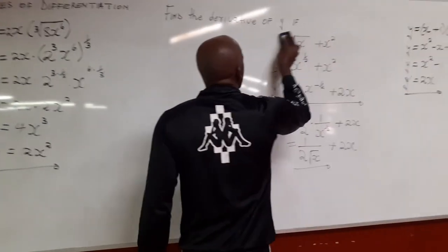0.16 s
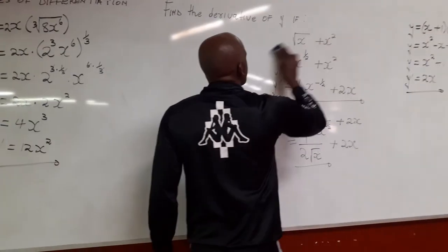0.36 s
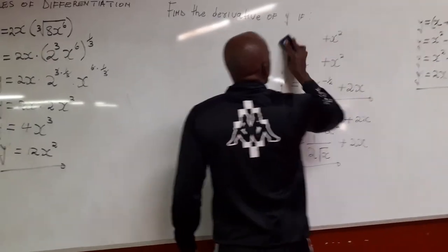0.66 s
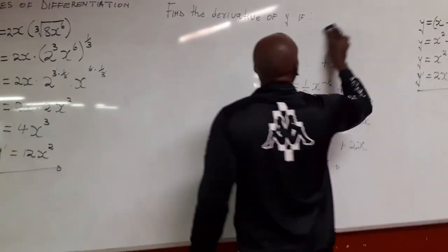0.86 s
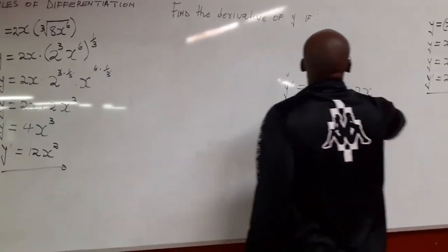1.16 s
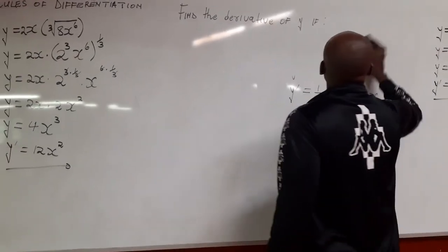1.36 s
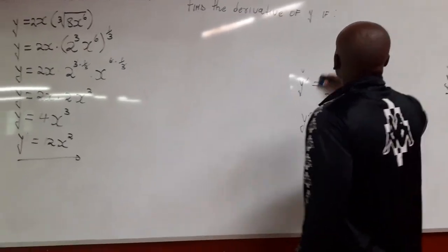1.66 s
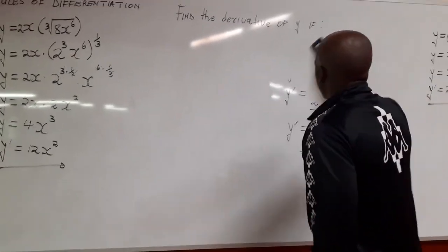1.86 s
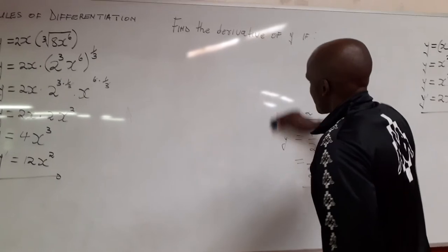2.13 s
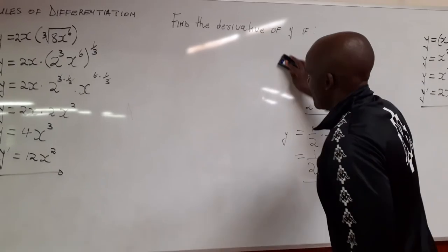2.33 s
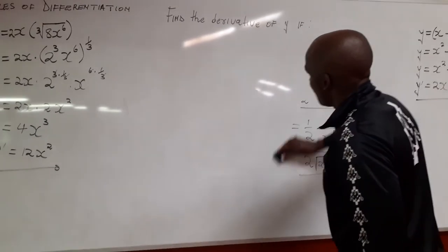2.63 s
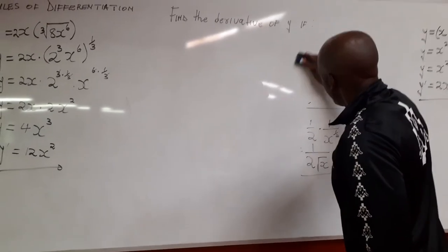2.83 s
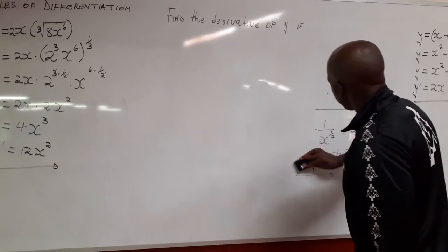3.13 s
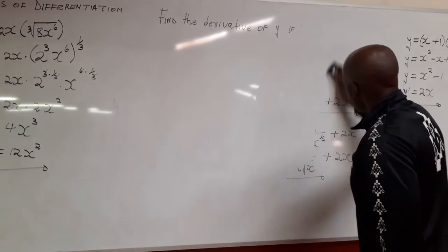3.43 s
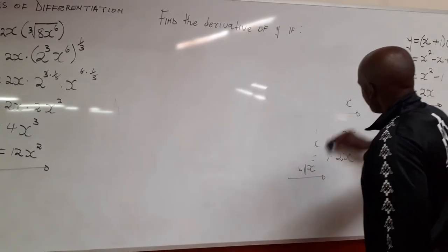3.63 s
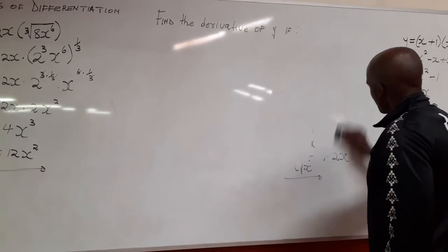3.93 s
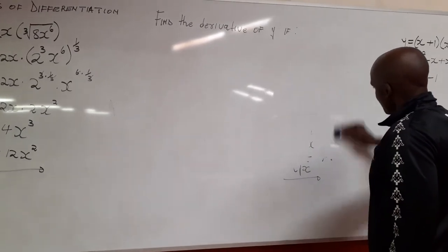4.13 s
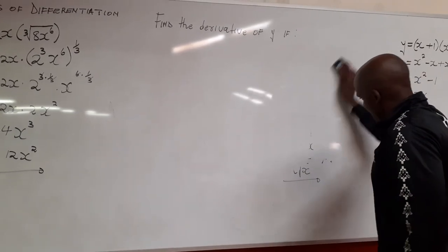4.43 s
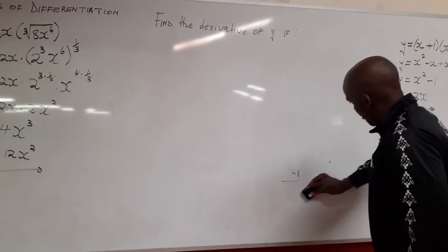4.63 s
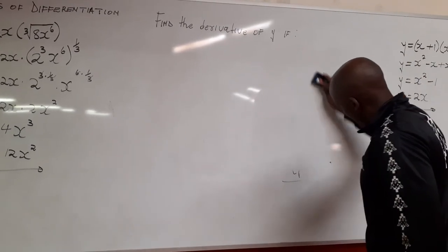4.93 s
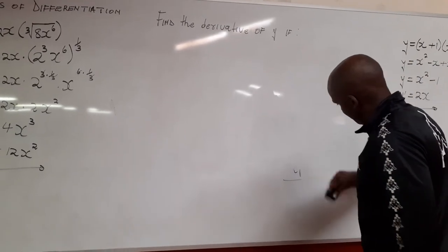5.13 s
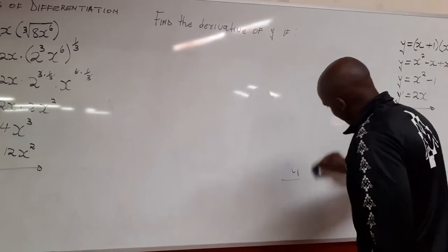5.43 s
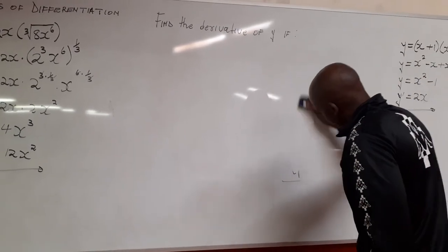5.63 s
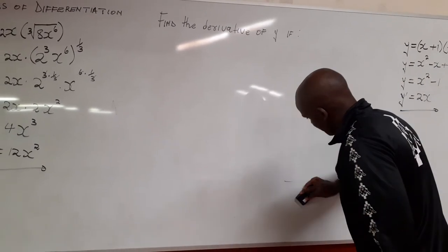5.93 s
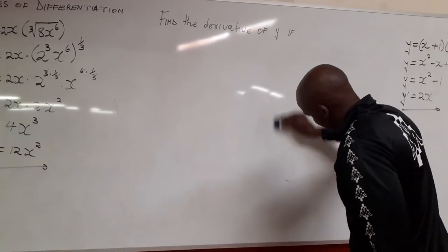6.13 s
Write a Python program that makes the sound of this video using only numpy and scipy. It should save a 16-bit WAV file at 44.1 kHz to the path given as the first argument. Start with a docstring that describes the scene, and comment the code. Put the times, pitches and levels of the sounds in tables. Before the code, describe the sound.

A felt eraser wipes a whiteboard in a bare classroom for about six seconds, hissing softly back and forth at roughly four strokes a second while the board booms gently. A hard rasping swipe opens, followed by small squeaks near 0.4, 1 and 1.5 seconds. A finger partly covers the left side of the hand-held microphone, dulling that side and making close knocks and rubs far louder than the wiping. The loudest knock is at 0.1 seconds, and more follow until about 3 seconds. The plastic case clicks a few times between 1.8 and 2.5 seconds. Hard swipes stand out at 2.7 and 4.5 seconds, the latter with a squeak and a few lighter bumps. Low hoots come between them, around 3.5 seconds. Near 5.6 seconds the case creaks faintly, and a low hand rumble runs under the last strokes.

```python
"""A felt eraser wipes a whiteboard in a bare classroom. From the start, friction hisses with each stroke
and the board booms softly; a hard swipe comes first, then small stick-slip squeaks. A finger half covers
the left microphone port of a hand-held camera, dulling it, and bumps and rubs there, most in the first
three seconds. Around 2 s the case clicks. Hard swipes stand out at 2.7 s and 4.5 s, with low hoots
between them. Near 5.6 s the case creaks and the holding hand shudders under the last strokes."""
import sys
import numpy as np
from scipy import signal
from scipy.fft import rfft, irfft, next_fast_len
from scipy.io import wavfile
from scipy.ndimage import uniform_filter1d

SR = 44100
rng = np.random.default_rng(int(sys.argv[2]) if len(sys.argv) > 2 else 0)


def put_to_file(sound):
    """Save the sound as 16-bit audio at rate SR, in the file named by the first command-line argument."""
    columns = np.atleast_2d(sound).T  # one column per channel
    safe = np.clip(columns, -1, 1)
    whole_steps = np.round(safe * 32767)
    wavfile.write(sys.argv[1], SR, whole_steps.astype(np.int16))


N = 277389
TIME = np.arange(N) / SR

# Event levels are those at the source, ahead of filters and channel gains.
# strokes to and fro: start t/s, hiss level/dB, change of hiss at the opening turn/dB, boom level/dB
STROKES = [(-.14, -53.5, 10, -50), (.19, -63, -8, -58), (0.344, -58.5, -4, -63), (0.576, -61, -9, -60.5),
           (.765, -56, -8.5, -70), (1.062, -61.5, -3, -56), (1.279, -61, -4.5, -62), (1.46, -59, -7, -58),
           (1.701, -60.5, -6, -58.5), (1.895, -59.5, -7.5, -59.5), (2.14, -61.5, -0.5, -67),
           (2.36, -63.5, -13, -59), (2.531, -50, -2.5, -53.5), (2.77, -61.5, 0, -57.5),
           (2.985, -59.5, -8.5, -60), (3.205, -60.5, -6.5, -63), (3.49, -62.5, -6.5, -61),
           (3.66, -63, -4.5, -60.5), (3.88, -62.5, -9.5, -71), (4.071, -65.5, -4, -72),
           (4.36, -49, -4, -55), (4.701, -63, -7, -72.5), (4.981, -61, -7.5, -65),
           (5.192, -62.5, -5, -61.5), (5.386, -66, -6.5, -61.5), (5.52, -65.5, 0, -63.5),
           (5.78, -60, -13.5, -65), (6.02, -59.5, -8, -72)]
# hard swipes: peak t/s, swell t/s, fade to 1/e t/s, low rasp level/dB, high rasp level/dB, drum level/dB
SWIPES = [(.035, 0.12, 0.055, -45.5, -47.5, -47), (.4, 0.062, 0.18, -65.5, -66, -61),
          (0.818, 0.078, 0.41, -71, -69, -66.5), (1.601, .04, 0.3, -78, -63, -74),
          (2.125, .085, .045, -60, -52.5, -69), (2.51, 0.067, 0.082, -67, -65, -72),
          (2.689, 0.095, .16, -46, -52.5, -46.5), (3.43, 0.084, 0.063, -71, -89, -64.5),
          (3.62, 0.092, 0.11, -63.5, -86.5, -66), (4.512, .105, .044, -51, -45.5, -61.5),
          (5.14, .02, 0.067, -78.5, -79, -77.5), (5.938, 0.013, 0.047, -71, -70.5, -71)]
# squeaks and hoots of the pad: t/s, length t/s, level/dB, start f/Hz, end f/Hz, bandwidth f/Hz
SQUEAKS = [(.33, 0.076, -58, 2350, 1970, 300), (0.408, 0.07, -61, 1880, 1800, 300),
           (1.007, 0.1, -62, 2220, 1590, 1023), (1.516, 0.063, -68, 4080, 3800, 200),
           (1.561, .046, -71, 3040, 2750, 250), (3.401, 0.081, -57.5, 415, 466, 87),
           (3.568, .17, -65.5, 430, 434, 140), (3.57, 0.16, -66.5, 1220, 1140, 188),
           (3.592, 0.16, -75.5, 1530, 1660, 300), (4.482, .16, -56, 2360, 2550, 420)]
# finger bumps on the port: t/s, knock level/dB, knock f/Hz, thump level/dB, thump f/Hz
BUMPS = [(0.067, -39, 2500, -24, 280), (0.1025, -1.5, 1177, -6.5, 205), (0.3148, -18, 555, -19.5, 181),
         (0.4796, -20, 342, -20, 87), (0.5025, -54, 1340, -26, 92), (0.6236, -49, 500, -28.5, 262),
         (.8916, -15, 740, -20.5, 176), (1.0188, -51, 996, -33.5, 84), (1.168, -28.5, 830, -24, 196),
         (1.4663, -34, 772, -33, 179), (1.6012, -24.5, 380, -30, 85), (1.6216, -51, 920, -27.5, 124),
         (1.9347, -41, 860, -38.5, 96), (2.1214, -41, 3920, -30, 260), (2.4537, -39.5, 260, -29.5, 95),
         (2.5249, -29, 294, -40, 90.8), (2.817, -16.5, 1080, -20.5, 143), (4.4047, -32.5, 383, -32, 140),
         (4.6077, -50, 1810, -31, 163), (4.6255, -39.5, 835, -36, 138)]
# finger slides over the port: t/s, length t/s, rumble level/dB, scratch level/dB
RUBS = [(0.102, 0.0051, -21, -22.5), (0.111, 0.044, -45, -46.5), (0.316, 0.012, -31, -36),
        (.35, 0.11, -62, -71), (0.475, 0.0038, -55, -41), (0.497, .015, -53, -60),
        (0.623, 0.044, -48, -59.5), (0.891, 0.1, -43, -44), (0.918, 0.0043, -52, -40.5),
        (0.954, 0.0075, -63, -42), (1.166, 0.13, -46, -48), (1.254, 0.0027, -59, -40),
        (1.469, 0.051, -45, -47.5), (1.621, 0.12, -53.5, -54.5), (1.768, 0.11, -49.5, -55),
        (1.936, 0.23, -49.5, -60), (2.658, 0.16, -45, -53), (2.811, 0.053, -38.5, -43),
        (2.882, 0.077, -42.5, -48), (3.319, 0.076, -48, -66.5), (3.414, 0.04, -45, -69),
        (4.594, 0.11, -48, -58)]
CLICKS = [(1.8272, -23, 1250, -27.5), (1.829, -39, 3500, -31), (1.932, -29.5, 1110, -46),
          (2.0598, -34, 1490, -50), (2.4982, -27, 2700, -34)]  # case clicks: t/s, tick level/dB, tick f/Hz, snap level/dB
CREAK = [(5.615, -77, 660), (5.648, -57, 730), (5.671, -61, 887), (5.696, -71, 986)]  # course of the case's creak: t/s, level/dB, resonance f/Hz
SHUDDER = [(5.52, -81.5), (5.57, -62.5), (5.8, -72), (6.03, -60.5), (6.27, -85.5)]  # course of the holding hand's shudder: t/s, level/dB
# spectral shapes, each: f/Hz, relative level/dB
FELT_HISS = [(500, -24), (2300, -14.5), (3300, -10), (4500, -4.5), (6000, -2), (8600, 3), (9600, -5.5),
             (10700, -7.5), (12300, -1), (15500, -3)]  # fibres on the board
PANEL_BOOM = [(15, -57), (30, -35), (60, -3), (85, -7), (105, 7.5), (135, -9.5), (170, -7), (300, -41.5)]  # the board's lowest modes
PANEL_DRUM = [(120, -23.5), (220, -8), (330, 5.5), (430, -1), (600, -15), (900, -17), (2000, -61.5)]  # its higher, hollow modes
LOW_RASP = [(300, -20), (560, -9), (820, 0.5), (1120, -5.5), (1500, -2.5), (1900, -8.5), (3000, -32.5)]  # hard-pressed pad, lower band
HIGH_RASP = [(1000, -20.5), (1700, -3), (2350, -3), (3200, -6.5), (4500, -12), (6000, -12), (9000, -35)]  # hard-pressed pad, upper band
SKIN_RUMBLE = [(15, -26.5), (50, -14), (105, 3), (200, -7), (350, -1.5), (600, -20.5), (1200, -29),
               (4000, -72)]  # sliding finger, lower band
SKIN_SCRATCH = [(200, -5.5), (550, 2), (900, 4), (1400, -6), (2300, -4), (3300, -14.5), (4500, -22),
                (6000, -35.5), (10000, -57.5)]  # sliding finger, upper band
HAND_TREMBLE = [(15, -17), (35, 0.5), (60, 5), (80, -3), (140, -31)]  # shudder of the holding hand
ROOM_AIR = [(20, -7), (60, 7), (105, 14.5), (160, 18.5), (400, 9.5), (600, 7.5), (1400, -4), (2500, -7.5),
            (8000, -10), (16000, -11)]  # steady background
COVERED_PORT = [(60, -1), (330, 0), (900, -4.5), (1400, -8), (2300, -5), (4500, -6), (6000, -11),
                (8500, -27), (9700, -15.5), (10800, -8.5), (12300, -9.5), (15000, -12.5)]  # transmission past the finger
ROOM_DECAY = [(125, 1.1), (500, 1.1), (1400, 0.79), (2500, 1.25), (5000, 2.2), (12000, .3)]  # classroom reverberation: f/Hz, 60 dB decay t/s


def eraser():
    """Sliding friction: felt fibres hiss while the forced vibration of the panel booms and drums."""
    hiss_gain, boom_gain = stroke_gains()
    drum_t60_s = 1.5
    drum_fade_s = drum_t60_s / np.log(1000)
    ring = sum(amp(db) * press(s, swell_s, drum_fade_s) for s, swell_s, _, _, _, db in SWIPES)
    fibres = early_reflections(friction(FELT_HISS, slips_per_s=3600, spread_db=1.5), echo_db=-22)
    fizz = signal.sosfiltfilt(signal.butter(4, 8800, "high", fs=SR, output="sos"), fibres)
    sheen = np.minimum(hiss_gain / amp(-59), 1) ** 0.27  # a weak hiss loses its finest fizz
    hiss = hiss_gain * (fibres + (sheen - 1) * fizz)
    boom = boom_gain * friction(PANEL_BOOM, slips_per_s=2700, spread_db=2.0)
    drum_gain = np.hypot(amp(-10) * boom_gain, ring)  # strokes and ringing swipes add in power
    drum = drum_gain * friction(PANEL_DRUM, slips_per_s=1600, spread_db=-0.5)
    return hiss + boom + drum


def stroke_gains():
    """Reciprocating motion: hiss dips as the hand slows into a turn; boom glides from stroke to stroke."""
    last_turn_s, last_dip_db = 6.3, -16.5
    rest, fastest = .06, 0.54  # shares of a stroke: still at each end, gone by at top speed
    start, hiss_db, dip_db, boom_db = np.transpose(STROKES)
    turns = np.append(start, last_turn_s)
    progress = np.interp(TIME, turns, np.arange(len(turns))) % 1
    speed = np.sin(np.pi * np.interp(progress, [rest, fastest, 1 - rest], [0, .5, 1]))
    middle = start + np.diff(turns) / 2
    dip = np.interp(TIME, turns, np.append(dip_db, last_dip_db)) * (1 - speed ** 1.1)
    hiss_gain = amp(np.interp(TIME, middle, hiss_db) + dip)
    boom_gain = amp(np.interp(TIME, middle, boom_db) + 0.5 * (2.5 - speed))
    return hiss_gain, boom_gain


def swipes():
    """Friction grows with normal force: pressed hard, the pad rasps and excites the room."""
    low, high = np.zeros((2, N))
    for s, swell_s, fade_s, low_db, high_db, _ in SWIPES:
        push = press(s, swell_s, fade_s)
        low += amp(low_db) * push
        high += amp(high_db) * push
    rasp = low * friction(LOW_RASP, slips_per_s=1500, spread_db=0.5)
    rasp += high * friction(HIGH_RASP, slips_per_s=2500, spread_db=3.5)
    return classroom(early_reflections(rasp, echo_db=-13), wet=0.15)


def press(peak_s, swell_s, fade_s):
    """Envelope of a swipe: a smooth swell, then exponential decay."""
    swell = np.clip(1 + (TIME - peak_s) / swell_s, 0, 1)
    return np.sin(np.pi / 2 * swell) ** 2 * np.exp(-np.maximum(TIME - peak_s, 0) / fade_s)


def squeaks():
    """Stick-slip: the half-sticking pad gives a narrow band of noise that glides in pitch."""
    out = np.zeros(N)
    for s, length, db, start_hz, end_hz, width in SQUEAKS:
        hz = np.linspace(start_hz, end_hz, int(length * SR))
        noise = rng.standard_normal(SR)[:len(hz)]
        whistle = resonate(resonate(noise, hz, width), hz, width)
        add(out, s, amp(db) * unit(whistle * signal.windows.tukey(len(hz), .5)))
    return classroom(np.array([out, out]), wet=0.51)


def finger():
    """Impact and cavity resonance: a knock, then a slower swing of the port's air; sliding skin rubs."""
    out, rumble, scratch = np.zeros((3, N))
    for s, knock_db, knock_hz, thump_db, thump_hz in BUMPS:
        add(out, s, amp(knock_db) * pulse(knock_hz, rise_turns=.36, sink=0.87))
        add(out, s + 1.5 / knock_hz, amp(thump_db) * pulse(thump_hz, rise_turns=.33, sink=0.25))
    out += amp(-6) * resonate(out, np.full(N, 930), width_hz=220)  # hollow clack of the air pocket
    # the port leaks bass; soft flesh damps treble
    out = signal.sosfilt(signal.butter(2, [68, 2700], "band", fs=SR, output="sos"), out)
    for s, length, rumble_db, scratch_db in RUBS:
        add(rumble, s, amp(rumble_db) * slide(length))
        add(scratch, s, amp(scratch_db) * slide(length))
    out += rumble * friction(SKIN_RUMBLE, slips_per_s=860, spread_db=2.5, channels=1)[0]
    out += scratch * friction(SKIN_SCRATCH, slips_per_s=1200, spread_db=1.5, channels=1)[0]
    return out * amp([[0], [-42]])


def slide(length, grip_s=0.005, ease_db=-5, release_s=.011):
    """Contact pressure of a sliding finger: quick grip, slow easing, exponential release."""
    t = TIME[:SR // 2]
    grip = np.minimum(t / grip_s, 1)
    easing = amp(ease_db * np.minimum(t / length, 1))
    return grip * easing * np.exp(-np.maximum(t - length, 0) / release_s)


def case_clicks():
    """Impulse response of a plastic case: a tick and snap near the right port, a thud in the body."""
    ticks, snaps, thuds = np.zeros((3, N))
    body_hz, thud_peak_s, snap_decay_s = 315, 0.0035, 0.00065
    t = TIME[:SR // 10]
    thud = np.sin(2 * np.pi * body_hz * t) * t / thud_peak_s * np.exp(1 - t / thud_peak_s)
    snap_fade = np.exp(-TIME[:SR // 100] / snap_decay_s)
    for s, db, hz, snap_db in CLICKS:
        bright_noise = unit(np.diff(rng.standard_normal(SR // 100 + 1)))
        add(ticks, s, amp(db) * pulse(hz, rise_turns=0.23, sink=0.81))
        add(thuds, s, amp(db - 19) * thud)
        add(snaps, s, amp(snap_db) * bright_noise * snap_fade)
    ticks += amp(-2) * resonate(ticks, np.full(N, 1540), width_hz=260)  # the shell rings briefly
    # small parts radiate little bass
    ticks = signal.sosfilt(signal.butter(3, 720, "high", fs=SR, output="sos"), ticks)
    return ticks * amp([[-3], [0]]) + snaps * amp([[-15], [0]]) + thuds


def case_creak(slips_per_s=600):
    """Stick-slip in the case: irregular impulses drive a rising resonance."""
    slips = (rng.random(N) < slips_per_s / SR) * rng.uniform(0.83, 1, N)
    s, _, hz = np.transpose(CREAK)
    hz = np.interp(TIME, s, hz)
    ringing = resonate(resonate(slips - slips.mean(), hz, width_hz=370), hz, width_hz=320)
    return envelope(CREAK) * unit(ringing) * amp([[2], [-2]])


def hand_shudder():
    """Structure-borne noise: the trembling hand rumbles through the case."""
    return envelope(SHUDDER) * unit(colour(rng.standard_normal((2, N)), HAND_TREMBLE))


def early_reflections(x, echo_db):
    """Comb filtering: delayed copies from board, floor and desks interfere with the direct sound."""
    out = x.copy()
    for channel, direct in zip(out, x):
        for delay_s in rng.uniform(.002, .022, size=6):
            add(channel, delay_s, amp(echo_db) * rng.choice([-1, 1]) * direct)
    return unit(out) * x.std()


def classroom(x, wet):
    """Reverberation: sparse reflections, decaying at a rate set by frequency, take the power share wet."""
    taps = rng.standard_normal((2, SR)) * (rng.random((2, SR)) < 3000 / SR)
    hz, t, bands = signal.stft(taps, SR, nperseg=256)
    decay = amp(-60 * t / read(ROOM_DECAY, hz)[:, None])
    tail = signal.istft(bands * decay, SR, nperseg=256)[1]
    echo = unit(signal.fftconvolve(x, tail, axes=1)[:, :N]) * x.std()
    return np.sqrt(1 - wet) * x + np.sqrt(wet) * echo


def room_air():
    """Ambient noise: a faint stationary rush, strongest in the bass."""
    return amp(-75) * unit(colour(rng.standard_normal((2, N)), ROOM_AIR))


def friction(spectrum, slips_per_s, spread_db, channels=2):
    """Shot noise: tiny slips of uneven size over a smooth rush, coloured by the body they shake."""
    shape = (channels, N)
    slips = (rng.random(shape) < slips_per_s / SR) * rng.choice([-1, 1], shape)
    slips = slips * amp(spread_db * np.minimum(rng.exponential(1, shape), 4))
    return unit(colour(unit(slips) + rng.standard_normal(shape), spectrum))


def resonate(x, hz, width_hz):
    """Forced response of one damped mode whose frequency follows the curve hz."""
    phasor = np.exp(2j * np.pi * np.cumsum(hz) / SR)
    pole = np.exp(-np.pi * width_hz / SR)
    return 2 * (phasor * signal.lfilter([1 - pole], [1, -pole], x / phasor)).real


def pulse(hz, rise_turns, sink):
    """Heavily damped oscillation: its envelope peaks after rise_turns cycles and its pitch sinks."""
    turns = np.log1p(sink * hz * np.arange(SR // 6) / SR) / sink
    age = turns / rise_turns
    return age * np.exp(1 - age) * np.sin(2 * np.pi * turns)


def colour(x, spectrum):
    """Linear filtering by a table of f/Hz, level/dB."""
    size = next_fast_len(N + 4096)
    gain = amp(read(spectrum, np.fft.rfftfreq(size, 1 / SR)))
    return irfft(rfft(x, size) * gain, size)[..., :N]


def read(points, hz):
    """Interpolation on a logarithmic frequency axis."""
    f, value = np.transpose(points)
    return np.interp(np.log(hz + 1), np.log(f + 1), value)


def envelope(curve):
    """Smoothed gain from rows of t/s, level/dB, silent outside them."""
    s, db = np.transpose(curve)[:2]
    return uniform_filter1d(amp(np.interp(TIME, s, db)) * (TIME > s[0]) * (TIME < s[-1]), size=90)


def add(mix, s, sound):
    """Superposition of a sound starting at s seconds."""
    part = mix[max(round(s * SR), 0):][:len(sound)]
    part += sound[:len(part)]


def amp(db):
    """Amplitude ratio from decibels."""
    return 10 ** (np.asarray(db) / 20)


def unit(x):
    """Normalisation to rms 1."""
    return x / np.sqrt(np.mean(x ** 2) + 1e-20)


def scene():
    """Transmission loss: the finger dulls all sound at the left port except its own bumps and rubs."""
    left, right = (eraser() + swipes() + squeaks()
                   + case_clicks() + case_creak() + hand_shudder() + room_air())
    return np.array([colour(left, COVERED_PORT), right]) + finger()


def record(dry, low_hz=45, high_hz=15850):
    """Band limiting: the camera cuts deep bass and the highest treble."""
    thin = signal.sosfilt(signal.butter(3, low_hz, "high", fs=SR, output="sos"), dry)
    lowpass = signal.firwin(511, high_hz, window=("kaiser", 9), fs=SR)
    return signal.oaconvolve(thin, lowpass[None], "same")


dry = scene()
out = record(dry)
put_to_file(out)
```